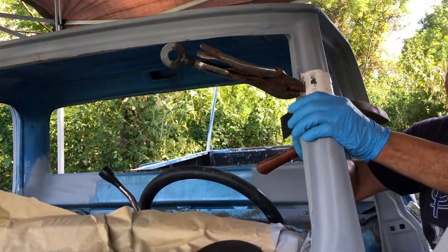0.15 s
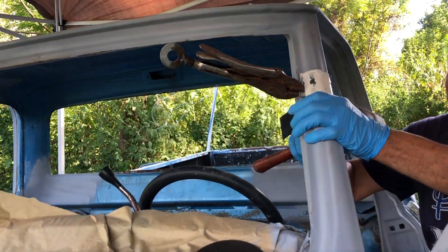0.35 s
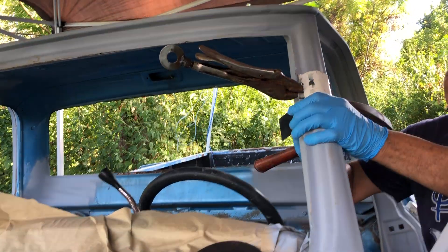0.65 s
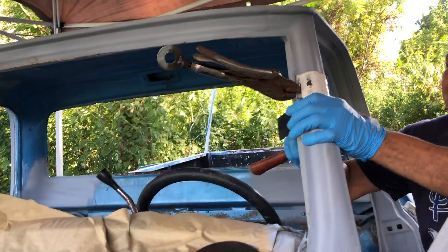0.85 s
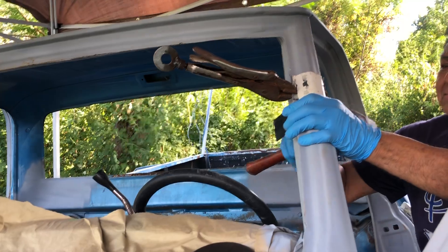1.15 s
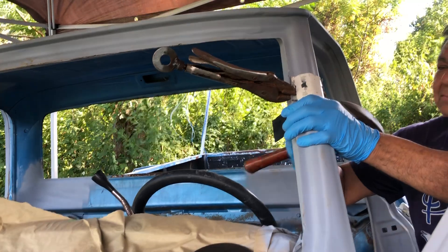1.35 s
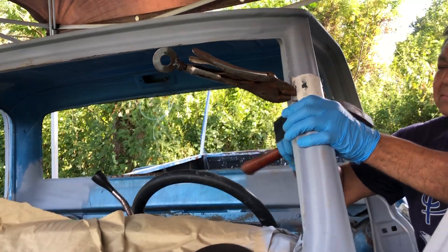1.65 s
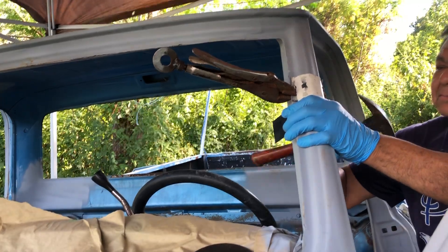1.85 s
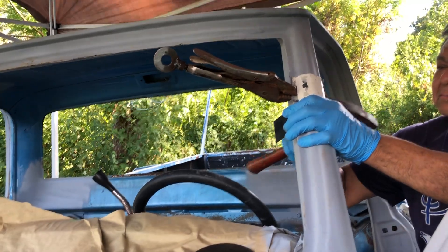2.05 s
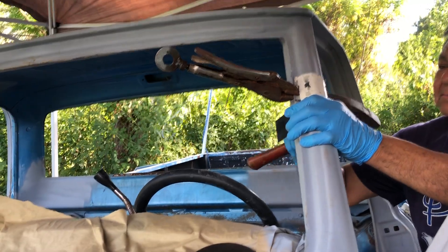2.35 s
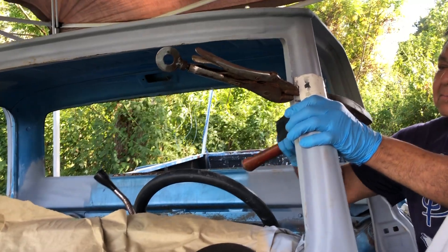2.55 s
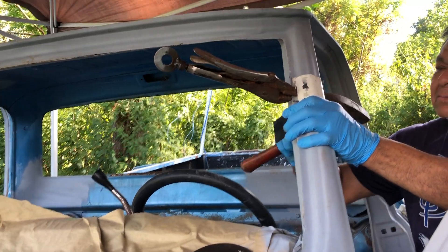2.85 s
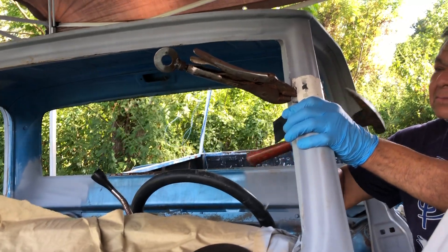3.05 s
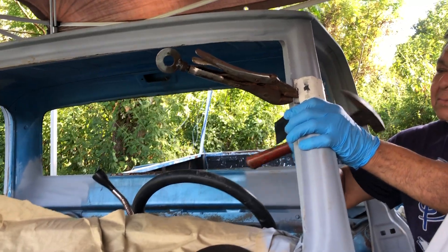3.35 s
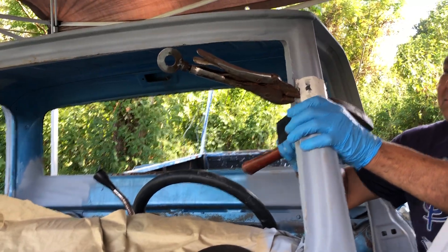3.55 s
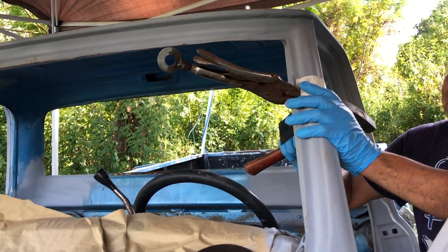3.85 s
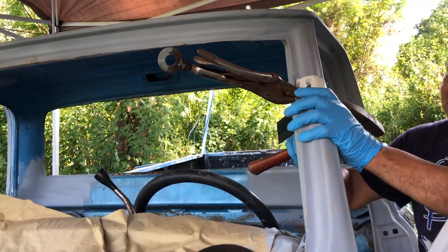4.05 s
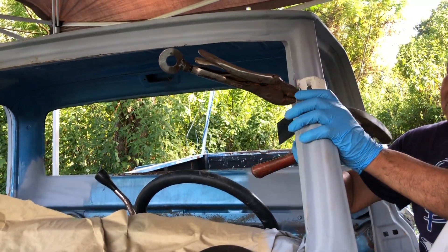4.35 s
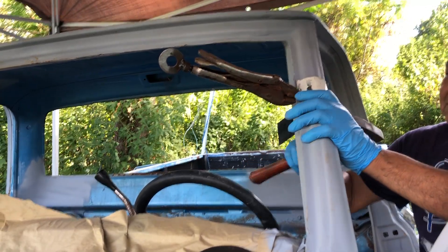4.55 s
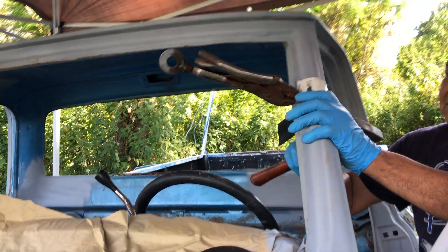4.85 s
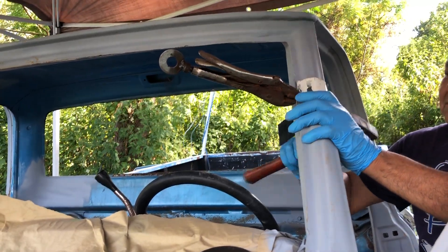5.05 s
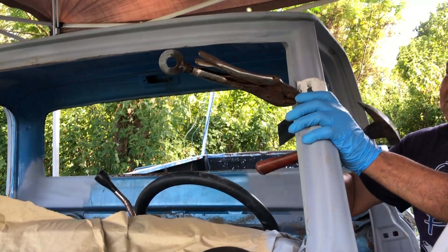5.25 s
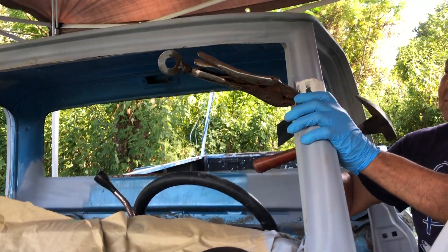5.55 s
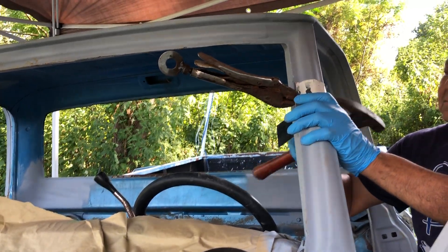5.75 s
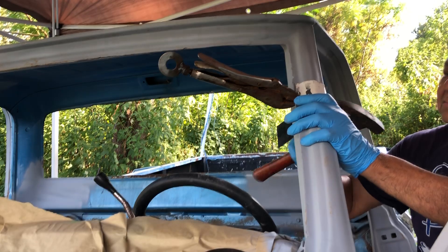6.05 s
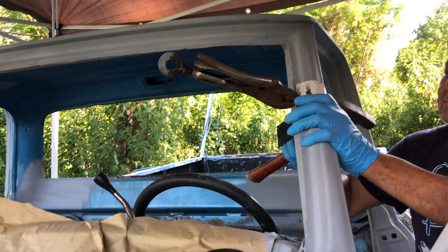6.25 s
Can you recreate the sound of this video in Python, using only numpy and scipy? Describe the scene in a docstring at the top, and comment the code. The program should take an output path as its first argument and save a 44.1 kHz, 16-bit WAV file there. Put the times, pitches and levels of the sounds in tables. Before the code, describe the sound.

Outdoors, a body hammer taps a sheet-steel truck pillar in steady hard cracks with clattering rebounds, pausing once, amid early wind buffets.

```python
"""Outdoors, gusts of wind at the microphone and a scuff of glove and dolly on paint lead in.
From about half a second a body hammer taps the steel pillar of a truck cab, a dolly held behind the sheet.
Each blow is a crack of shaped noise, a clatter of decaying noise and damped modes of sheet and cab; the dolly
jumps off and knocks back a moment later. The blows pause after the middle, then go on almost to the end.
Scuffs come between blows, gusts stop about halfway, and a distant wash of noise lies underneath."""
import sys
import numpy as np
from scipy import signal
from scipy.fft import rfft, irfft
from scipy.io import wavfile
from scipy.ndimage import uniform_filter1d

SR = 44100
rng = np.random.default_rng(int(sys.argv[2]) if len(sys.argv) > 2 else 0)


def wav_record(signal):
    """Record a signal, one row per channel, as 16-bit PCM in the file named by sys.argv[1]."""
    frames = np.transpose(np.atleast_2d(signal))
    bounded = np.clip(frames, -1, 1)
    # unit amplitude maps onto the largest positive 16-bit level
    quanta = np.round(bounded * 32767).astype(np.int16)
    wavfile.write(sys.argv[1], SR, quanta)


N = 282681  # length in samples


def hammering():
    """Repeated impact excitation: blows and the dolly's rebounds drive one and the same panel."""
    # Hammer blows. Each row: start in seconds, strength in dB, factor on clatter length.
    blows = [(0.5612, -7.5, 1), (0.841, -4, 1.08), (1.1295, -4.5, 1.14), (1.4113, -4, 1.37),
             (1.6878, -6.5, 1.8), (1.9684, -4, 1.52), (2.2544, -5, 1.33), (2.5435, -5.5, 1.4),
             (2.8422, -3.5, 1.2), (3.1344, -5.5, 1.4), (3.4168, -6, 1.71), (4.1792, -10, 0.65),
             (4.4965, -6, 1.23), (4.795, -3, 1.13), (5.0833, -5, 1.27), (5.3581, -3, 1), (5.646, -3, 1.01),
             (5.9278, -3, 1.17), (6.2227, -4.5, 1)]
    # The dolly lands back on the sheet. Each row: start in seconds, strength in dB,
    # brightness in dB per doubling of (frequency + 2 kHz), added to that of the seam.
    rebounds = [(0.5791, -9, -2), (0.8818, -11, -10), (1.1494, -8, -6.5), (1.2, -14.5, -1),
                (1.4309, -7.5, -8), (1.4806, -13.5, 0), (1.7086, -8, -5.5), (1.732, -5, 1),
                (2.0049, -1.5, -4), (2.2941, -3, -7.5), (2.583, -4.5, -8), (2.6343, -17.5, -6),
                (2.8829, -1.5, 1.5), (3.1689, -5, -1), (3.1985, -9.5, -3), (3.449, -4, -1),
                (3.4688, -11.5, -2), (4.2141, -18.5, -3.5), (4.5371, -15, -1.5), (4.8292, -6.5, -7.5),
                (5.1227, -5, -5), (5.4001, -4.5, -0.5), (5.6845, -4, 3), (5.9691, -4, 2.5),
                (6.2623, -5, -1.5), (6.3006, -18.5, -1.5)]
    rebound_length = 0.79  # factor on clatter length: the dolly damps the sheet as it lands
    out = np.zeros(N)
    hammer, dolly, panel = rng.standard_normal((3, SR * 3 // 4))
    for start_s, db, length in blows:
        blow = strike((start_s, db, length), hammer, panel,
                      crack_db=0.7, clatter_db=-6, boom_db=-3.0, sheet_db=-27.5,
                      crack_s=0.002, spread_s=0.02, backing_db=0, hardness_db=-1)
        add(out, start_s, blow)
    for start_s, db, bright_db in rebounds:
        rebound = strike((start_s, db, rebound_length), dolly, panel,
                         crack_db=-4.5, clatter_db=-10.5, boom_db=-7.5, sheet_db=-28,
                         crack_s=0.003, spread_s=0.0061, backing_db=4.5, hardness_db=bright_db)
        add(out, start_s, rebound)
    return out


def strike(row, contact, panel, crack_db, clatter_db, boom_db, sheet_db,
           crack_s, spread_s, backing_db, hardness_db):
    """Impact of steel on steel: a broadband contact force excites dense panel modes and the cab's low modes."""
    # Modes of the cab shell. Each row: frequency in Hz, relative level in dB, 60 dB decay time in seconds.
    cab_modes = [(104, -18, 1), (143, -16, .25), (207, -15, .42), (222, -13, .5), (237, -9, .55),
                 (249, -6, .42), (262, -7, .33), (275, -7, .34), (288, -7, .42), (316, -20, .7),
                 (334, -9, .36), (347, -2.5, .24), (364, -8, .2), (478, -12, .18), (505, -12, .16),
                 (548, -8.5, .19), (568, -6.5, .19), (660, -17, .22), (712, -14, .22), (790, -12, .21),
                 (937, -20, .2), (1082, -18, .2), (1452, -19, .2)]
    # Modes of the struck sheet. Each row: frequency in Hz, relative level in dB, 60 dB decay time in seconds.
    sheet_modes = [(1343, -6, .2), (2140, -6, .13), (2216, 0, .17), (2625, -3, .17), (2947, -4, .15),
                   (3400, -2, .12), (3570, -1, .15), (4820, -6, .1), (5130, -5, .11), (6050, -6, .1),
                   (8300, -6, .08)]
    # Colour of the contact crack. Each row: frequency in Hz, relative spectral density in dB per Hz.
    crack_colour = [(60, -18), (300, -30), (800, 6), (1050, -2.5), (1500, 2.5), (3500, 1.5), (6000, 0),
                    (7200, -3.5), (8600, -4.5), (12000, -9), (16000, -12)]
    # The crowd of overlapping panel modes. Each row: frequency in Hz, relative spectral density in dB per Hz.
    clatter_colour = [(30, -19), (65, -4.5), (150, -3), (280, 8.5), (420, 3), (650, 2), (1050, -3),
                      (2400, -2), (4000, -4.5), (6500, -7.5), (9500, -10), (12500, -14), (16000, -23.5)]
    # Decay of that crowd. Each row: frequency in Hz, 60 dB decay time in seconds for a length factor of 1.
    clatter_t60 = [(60, 1), (250, 0.2), (700, 0.2), (2500, 0.14), (6000, 0.12), (15000, 0.11)]
    # The panel answers differently as the hammer works along the seam. Each row: time in seconds,
    # relative boom of the cab in dB, brightness in dB per doubling of (frequency + 2 kHz),
    # lift of the cab modes near 650 Hz in dB, lift of crack and clatter near 1.9 kHz in dB.
    seam = [(.7, -25, 3.5, -2, -2), (1.41, -20.5, 2, 10, 3.5), (1.69, -18, 3, 5, -1), (2.2, -15, 3, 9, 0.5),
            (3.2, -9, 2.4, -5, -2.5), (4.2, -10, 0, 10.5, -4), (4.5, -13, -1, 7, -2.5),
            (4.8, -11.5, 0.9, 7, -2), (5.5, -7.5, -1.5, 2, 1), (6.2, -13.5, -.5, -3, -2)]

    start_s, db, length = row
    t = np.arange(len(panel)) / SR
    seam_s, *seam_columns = np.transpose(seam)
    boom, bright_db, knock_db, clang_db = (np.interp(start_s, seam_s, column) for column in seam_columns)
    boom = boom + backing_db
    bright_db = bright_db + hardness_db

    # about half the noise power is common to every blow, the rest depends on where the blow lands
    common = .7
    fresh = rng.standard_normal((2, len(t)))
    contact, panel = common * np.array([contact, panel]) + np.sqrt(1 - common ** 2) * fresh

    # a harder contact is brighter; a well-backed one drives more bass into the shell
    drum_growth, drum_hz = 0.3, 150  # dB of deep bass per dB of strength, corner: light taps move the cab less

    def tone(hz):
        backed_bass_db = 0.16 * (boom + 11) / (1 + (hz / 650) ** 2)
        drum_db = drum_growth * (db + 5) / (1 + (hz / drum_hz) ** 4)
        tilt_db = bright_db * np.log2((hz + 2000) / 6000)
        return amp(tilt_db + backed_bass_db + drum_db + clang_db * hump(hz, 1890, 0.4))

    # each spot lies on the nodes of some groups of modes and the crests of others
    spot_db, crowd_db, crowd_hz = 1.5, 2.5, 110.3  # unevenness of crack and clatter, spacing of clatter peaks
    groups_hz = np.arange(1000, 17000, 400)
    groups_db = spot_db * rng.standard_normal(len(groups_hz))

    def crack_gain(hz):
        ripple = amp(np.interp(hz, groups_hz, groups_db, left=0))
        return amp(read(crack_colour, hz)) * tone(hz) * ripple

    crack = colour(contact, crack_gain)
    crack = disperse(crack * (1 - np.exp(-t / .0003)) * np.exp(-t / crack_s), travel_s=.0012)
    # a contact of strength soft_db settles over soft_s, a harder one sooner
    soft_db, soft_s = -14.5, .003
    crack = crack * (1 - np.exp(-t / (soft_s * amp(soft_db - db) ** 2)))

    peaks_db = crowd_db * rng.standard_normal(size=256)

    def crowd_gain(hz):
        place = (hz - groups_hz[0]) / crowd_hz
        peaks = amp(np.interp(place, np.arange(len(peaks_db)), peaks_db, left=0))
        return amp(read(clatter_colour, hz)) * tone(hz) * peaks

    crowd = die_away(colour(panel, crowd_gain), clatter_t60, length)
    crowd = crowd * (1 - np.exp(-t / spread_s))  # bending waves spread through the shell
    # loose edges buzz against each other
    buzz = evened(uniform_filter1d(rng.standard_normal(len(t)), size=60))
    chatter = amp(2.2 * buzz)

    sheet = amp(sheet_db) * ring(sheet_modes, t, scatter_db=3, detune=0.002)
    shell = [(hz, level + knock_db * hump(hz, 653, 0.38), t60) for hz, level, t60 in cab_modes]
    cab = amp(boom + boom_db) * ring(shell, t, scatter_db=1.5, detune=.005)

    clatter_growth = 0.77  # dB of clatter and sheet per dB of strength: soft contacts rattle relatively more
    direct = amp(db) * (amp(crack_db) * crack + cab)
    rattle = amp(clatter_growth * db) * (amp(clatter_db) * crowd * chatter + sheet)
    return direct + rattle


def ring(modes, t, scatter_db, detune):
    """Modal superposition: damped sines whose strength, pitch and phase shift with the spot and the grip."""
    hz, db, t60 = np.transpose(modes)[:, :, None]
    strength, pitch, place = rng.standard_normal((3, len(modes), 1))
    # bending waves are dispersive: their travel time falls with the root of frequency
    travel_s, at_hz, scatter_rad = .015, 270, .7
    phase = scatter_rad * place - 4 * np.pi * travel_s * np.sqrt(at_hz * hz)
    fade = np.exp(-np.log(1000) * t / t60) * (1 - np.exp(-t * hz))
    sines = np.sin(2 * np.pi * hz * (1 + detune * pitch) * t + phase)
    return (amp(db + scatter_db * strength) * fade * sines).sum(0)


def disperse(x, travel_s):
    """Dispersion of bending waves in thin steel: treble arrives first, bass later (travel_s holds at 1 kHz)."""
    hz = np.fft.rfftfreq(len(x), 1 / SR)
    return irfft(rfft(x) * np.exp(-4j * np.pi * travel_s * np.sqrt(1000 * hz)), len(x))


def yard(x):
    """Diffuse scattering: weak echoes from awning and yard, as convolution with decaying noise."""
    # Faint after-ring. Each row: frequency in Hz, 60 dB decay time in seconds.
    yard_t60 = [(100, 4.5), (500, 2.2), (3000, 0.97), (8000, 0.66), (15000, 0.61)]
    t = np.arange(SR) / SR
    tail = die_away(rng.standard_normal(SR), yard_t60) * (1 - np.exp(-t / 0.0023))
    return signal.fftconvolve(x, tail / np.linalg.norm(tail))[:N]


def wind():
    """Turbulent pressure at the microphone port: each gust swells and dies, broken into short, dull eddies."""
    # Gusts. Each row: middle in seconds, peak level in dB, length in seconds, corner frequency in Hz.
    gusts = [(0.014, -32, .056, 493), (0.084, -20, 0.0087, 484), (0.139, -26.5, 0.058, 417),
             (0.188, -17, 0.026, 440), (0.263, -21.5, 0.12, 470), (0.352, -20, 0.028, 423),
             (0.41, -27.5, 0.058, 356), (0.633, -22.5, .055, 407), (0.742, -30, 0.037, 367),
             (1.941, -25.5, 0.12, 310), (2.113, -28, 0.054, 282), (2.454, -21.5, 0.069, 239),
             (2.508, -17, 0.03, 545), (3.049, -27, 0.1, 302)]
    # Spectrum of a gust. Each row: frequency as a multiple of the corner, relative density in dB per Hz.
    buffet_slope = [(.08, -4.5), (.3, 1.5), (.6, 1), (1, -2.5), (2, -17.5), (4, -70), (12, -73)]
    eddy_db, eddies_hz = 2.5, 44.7  # depth and pace of the eddies within a gust
    out, t = np.zeros(N), np.arange(-SR // 4, SR // 4) / SR
    for middle_s, db, length, corner_hz in gusts:
        rumble = colour(rng.standard_normal(len(t)), lambda hz: amp(read(buffet_slope, hz / corner_hz)))
        pace = colour(rng.standard_normal(len(t)), lambda hz: hump(hz, eddies_hz, 1))
        eddies = amp(eddy_db * pace)
        swell = np.exp(-np.pi * (t / length) ** 2)
        gust = evened(rumble * eddies * swell) * np.sqrt(np.mean(swell ** 2))
        add(out, middle_s + t[0], amp(db) * gust)
    return out


def shifts():
    """Sliding friction: short grainy scuffs of rubber and steel on paint, as band-shaped noise."""
    # Glove and dolly shift. Each row: middle in seconds, level in dB, length in seconds, centre in Hz.
    moves = [(0.089, -57, 0.22, 3970), (0.699, -50.5, 0.019, 4870), (0.808, -46, 0.05, 3880),
             (1.098, -57.5, 0.088, 7000), (1.332, -51.5, 0.24, 4000), (1.544, -48.5, .08, 3900),
             (2.155, -42.5, 0.017, 6000), (3.724, -53.5, 0.062, 9500), (3.886, -55, .008, 3000),
             (3.96, -56, .009, 12100), (4.028, -53, 0.0087, 3880), (6.134, -51.5, 0.017, 5570)]
    # the faint scuffs of the grip in between
    grip_per_s, grip_db, grip_s, grip_hz = 2, -62, 0.011, 7500
    grip_times = rng.uniform(0, N / SR, round(grip_per_s * N / SR))
    grip = [(middle_s, grip_db, grip_s, grip_hz) for middle_s in grip_times]
    out, t = np.zeros(N), np.arange(-SR // 4, SR // 4) / SR
    for middle_s, db, length, centre_hz in moves + grip:
        noise = rng.standard_normal(len(t))
        grain = evened(uniform_filter1d(rng.standard_normal(len(t)), size=100))
        slips = noise * amp(3 * grain)
        scuff = colour(slips, lambda hz: hump(hz, centre_hz, 0.74))
        add(out, middle_s + t[0], amp(db) * scuff * np.exp(-2 * (t / length) ** 2))
    return out


def wash():
    """Stationary coloured noise: far-off outdoor sound whose level swells very slightly."""
    # Distant background. Each row: frequency in Hz, relative spectral density in dB per Hz.
    wash_colour = [(15, -62), (25, -18), (76, -5), (439, -9.5), (531, -7.5), (734, -7.5), (818, -4.5),
                   (1100, -8.5), (1290, -11), (1610, -14), (3340, -32), (4610, -38), (14000, -48),
                   (16000, -56.5)]
    level_db = -40
    swell = colour(rng.standard_normal(N), lambda hz: np.exp(-hz / 3))
    noise = colour(rng.standard_normal(N), lambda hz: amp(read(wash_colour, hz)))
    return amp(level_db + 0.23 * swell) * noise


def amp(db):
    """Decibel law: level to amplitude factor."""
    return 10 ** (np.asarray(db) / 20)


def evened(x):
    """Power normalisation: scales to rms 1."""
    return x / np.sqrt(np.mean(x ** 2) + 1e-20)


def read(points, hz):
    """Interpolation of a curve's value on the log-frequency axis."""
    f, value = np.transpose(points)
    return np.interp(np.log(hz + 1e-6), np.log(f), value)


def hump(hz, centre_hz, octaves):
    """Gaussian resonance: a bell on the log-frequency axis."""
    return np.exp(-.5 * (np.log2((hz + 1) / centre_hz) / octaves) ** 2)


def colour(noise, gain):
    """Linear filtering: shapes noise with a gain that is a function of frequency; rms 1."""
    hz = np.fft.rfftfreq(len(noise), 1 / SR)
    return evened(irfft(rfft(noise) * gain(hz), len(noise)))


def die_away(x, t60s, length=1):
    """Frequency-dependent damping: every band decays exponentially at its own speed."""
    hz, t, z = signal.stft(x, SR, nperseg=256)
    z = z * amp(-60 * t / (length * read(t60s, hz)[:, None]))
    return signal.istft(z, SR, nperseg=256)[1][:len(x)]


def add(mix, start_s, sound):
    """Superposition: adds a sound to the mix in place, cut off at both ends of the mix."""
    start = round(start_s * SR)
    sound = sound[max(-start, 0):]
    part = mix[max(start, 0):][:len(sound)]
    part += sound[:len(part)]


def scene():
    """Superposition of metal, its echoes, wind, scuffs and wash."""
    metal = hammering()
    return (metal + amp(-28) * yard(metal) + wind() + shifts() + wash())[None]


def record(dry):
    """Band limiting and saturation: bass roll-off, rounding of the loudest peaks, then a treble limit."""
    ceiling, edge_hz = .62, 16050
    high_pass = signal.butter(4, 40, "high", fs=SR, output="sos")
    sound = signal.sosfilt(high_pass, dry[0])
    held = sound / (1 + (sound / ceiling) ** 4) ** (1 / 4)
    low_pass = signal.firwin(301, edge_hz, window=("kaiser", 9), fs=SR)
    return signal.oaconvolve(held, low_pass, "same")[None]


dry = scene()
out = record(dry)
wav_record(out)
```